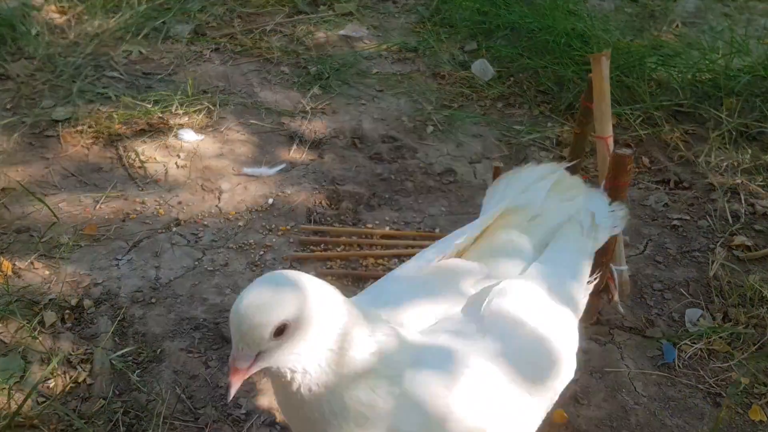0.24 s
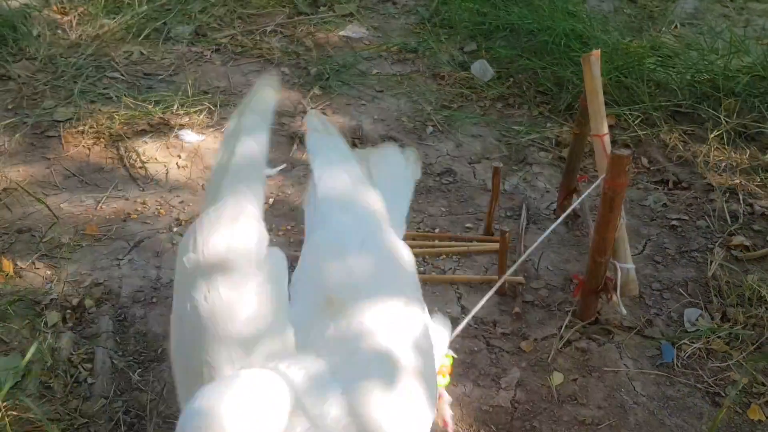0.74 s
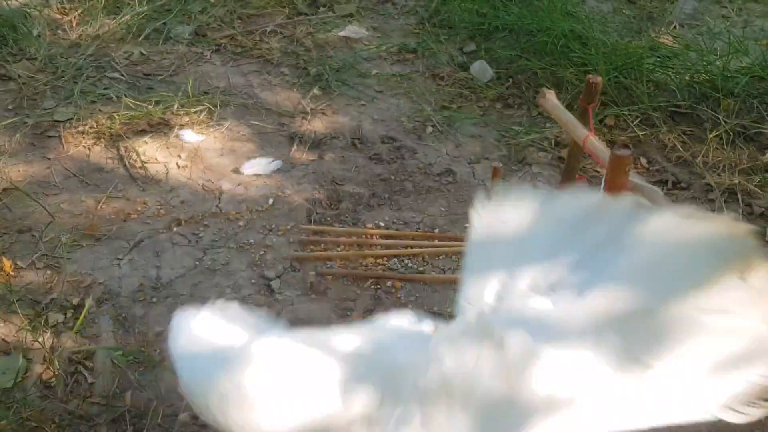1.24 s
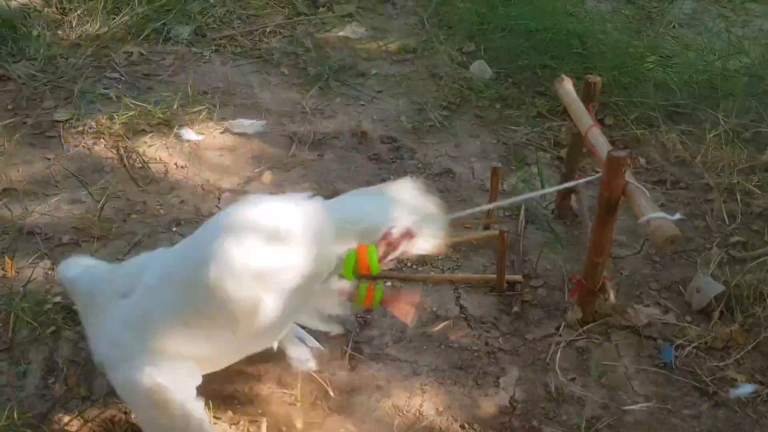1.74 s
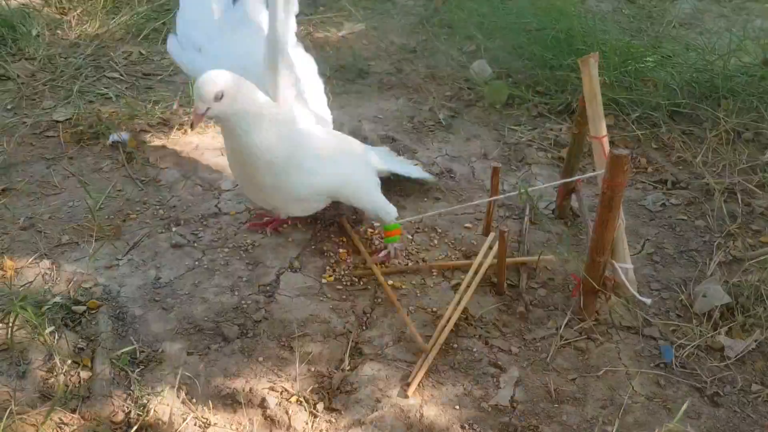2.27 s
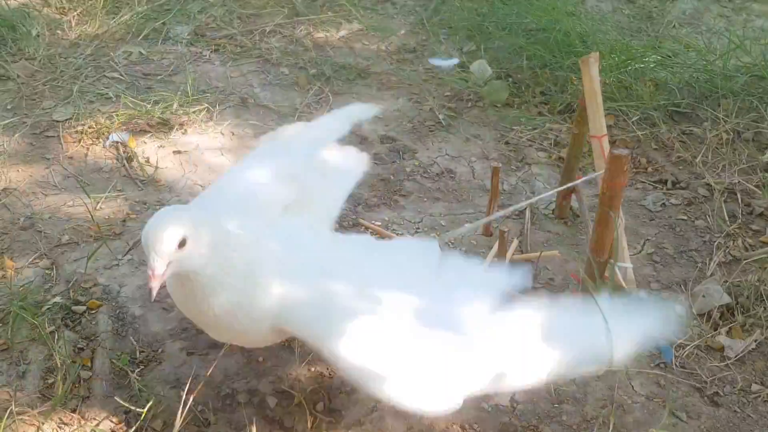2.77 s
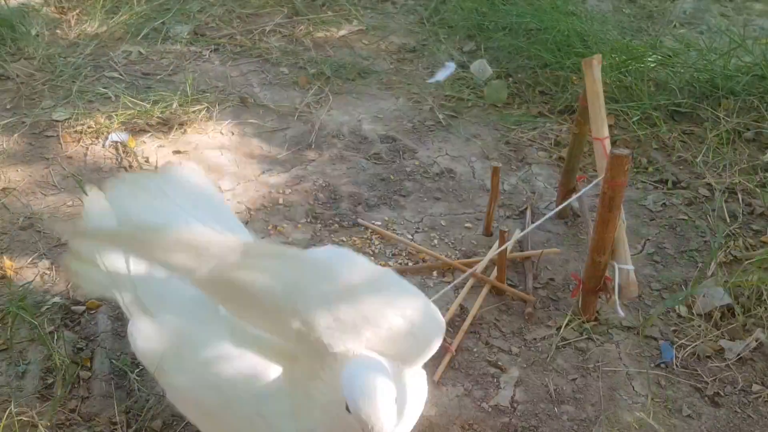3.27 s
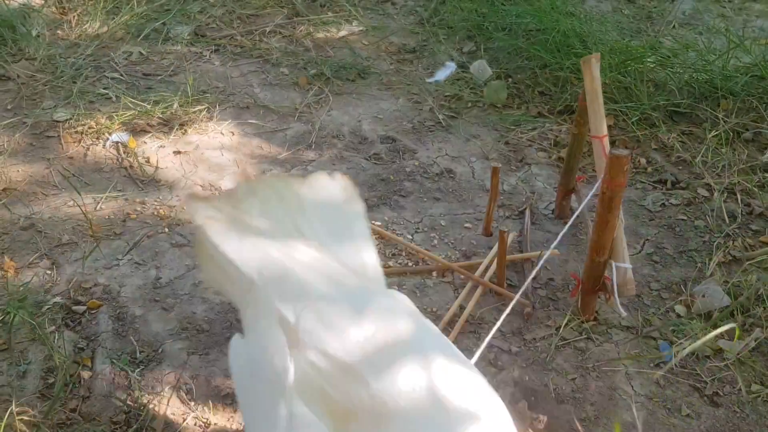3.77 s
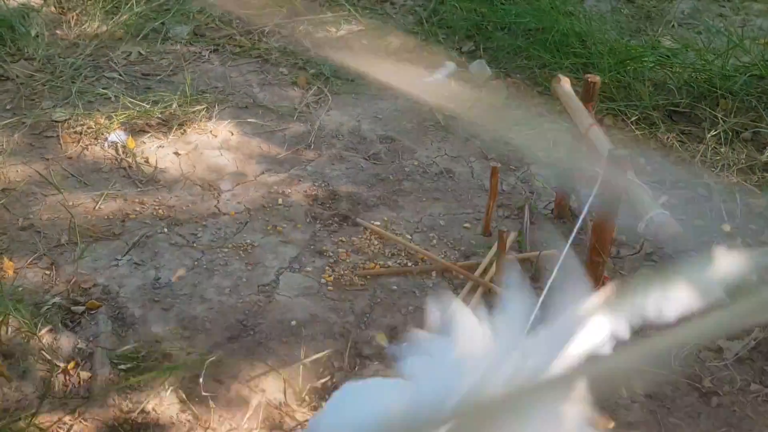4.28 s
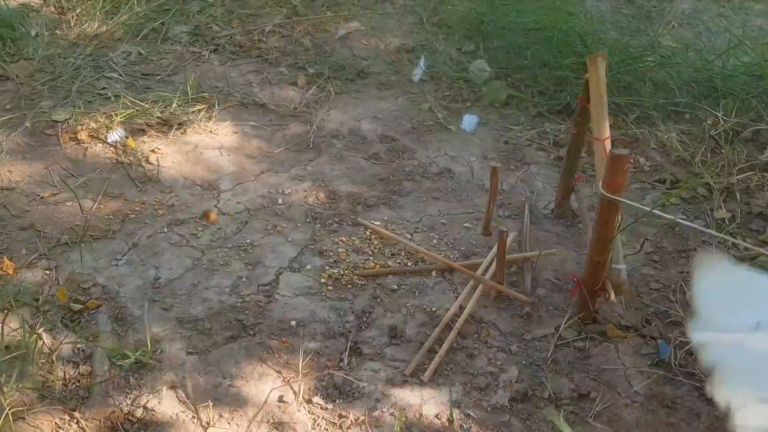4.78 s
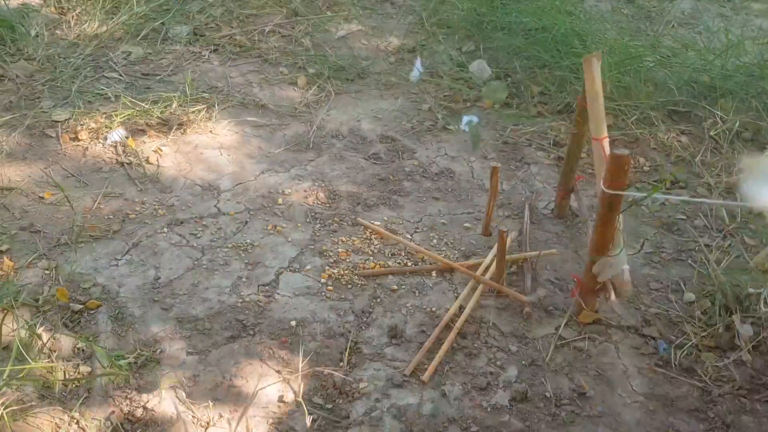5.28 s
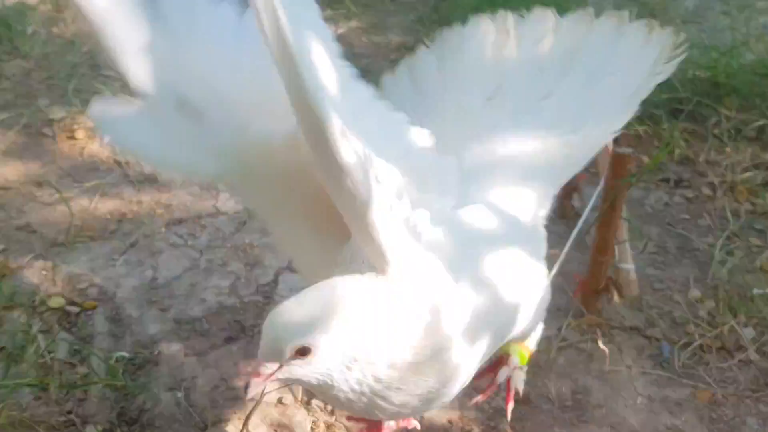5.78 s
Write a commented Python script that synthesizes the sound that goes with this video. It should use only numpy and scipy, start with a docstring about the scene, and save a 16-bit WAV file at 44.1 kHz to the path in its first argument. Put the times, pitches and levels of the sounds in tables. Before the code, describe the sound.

Close, frantic pigeon wingbeats come in three flurries, clapping and buffeting the microphone, with faint scuffling on dry grass between.

```python
"""A tethered pigeon beats its wings in three bursts, close to a pair of small microphones.
Friction of feathers in the bursts, and of feet on dry grass between them, makes a grainy rustle; impacts
add cracks, rings and thuds. Each downstroke sends a pressure pulse to the microphone ports, and its
turbulent wake buffets them. Far birds call faintly in harmonic tones over the open-air hush."""
import sys
import numpy as np
from scipy import signal
from scipy.fft import rfft, irfft, next_fast_len
from scipy.io import wavfile

SR = 44100
rng = np.random.default_rng(int(sys.argv[2]) if len(sys.argv) > 2 else 0)


def log_audio(samples):
    """Write samples as a 16-bit WAV file to the path given in sys.argv[1]."""
    # one column per channel
    frames = np.atleast_2d(samples).T
    # limit to full scale, then quantise
    limited = np.clip(frames, -1, 1)
    pcm = np.round(limited * 32767).astype(np.int16)
    wavfile.write(sys.argv[1], SR, pcm)


N = 265393

# Spectra of three bands of friction hiss and of the swept air: (frequency [Hz], spectral density [dB])
DULL_SPECTRUM = [(500, -25.5), (1300, 4), (2500, 2), (5000, -5), (8000, 0), (12000, -28)]
EDGE_SPECTRUM = [(2500, -27.5), (4200, -1), (7000, -3), (10000, -23.5)]
BRIGHT_SPECTRUM = [(3000, -27.5), (6500, -6.5), (10000, 1.5), (16000, 2)]
WHOOSH_SPECTRUM = [(100, -23.5), (250, 6), (500, 1), (1000, -3.5), (1600, -16.5), (4000, -38.5)]
# Rustle of feathers in the bursts, and of feet on dry grass between them:
# (time [s], relative level [dB], brightness [dB])
RUSTLE_CURVE = [(0.0, -55.5, 2.5), (0.08, -67, 2.5), (0.55, -63, 6), (1.0, -62, 5), (1.1, -46.5, 1.5),
                (1.3, -40.5, -0.5), (1.62, -52.5, 1), (1.95, -40.5, 0.5), (2.18, -55.5, 1),
                (2.3, -67.5, 3.5), (2.5, -67.5, 2), (2.95, -67, 5.5), (3.6, -76.5, 2), (3.77, -67, 3.5),
                (4.0, -63, 3), (4.17, -41, -1.5), (4.47, -40.5, 2.5), (4.6, -56, 0), (5.05, -57.5, 3),
                (5.31, -46, 1), (5.6, -50.5, 1.5), (5.86, -66, 1), (6.02, -55, 1)]


def rustle(grain_db=1.5, grain_hz=300, flutter_db=2.5, flutter_hz=30,
           ticks_per_s=110, tick_db=6, tick_s=0.00044):
    """Stick-slip friction: barbs or dry grass catch and let go, a ticking hiss over a duller whoosh."""
    level_db, bright_db = in_time(RUSTLE_CURVE)
    whoosh_flutter, dull_flutter, edge_flutter, bright_flutter = from_db(flutter_db * drift(flutter_hz, 4))
    slips = rng.random(N) < ticks_per_s / SR
    impulses = slips * np.minimum(rng.exponential(1, N), 2) * from_db(tick_db)
    ticks = signal.lfilter([1], [1, -np.exp(-1 / (tick_s * SR))], impulses)
    grain = unit_rms(from_db(grain_db * drift(grain_hz, channels=2)) * (1 + ticks))
    dull = dull_flutter * from_db(-1.5 - bright_db) * noise(DULL_SPECTRUM)
    edge = edge_flutter * from_db(-8.5) * noise(EDGE_SPECTRUM)
    bright = bright_flutter * from_db(bright_db / 2) * noise(BRIGHT_SPECTRUM)
    whoosh = whoosh_flutter * noise(WHOOSH_SPECTRUM, shared=0.33)
    swish_hiss, swish_whoosh = swishes()
    hiss_gain = np.hypot(from_db(level_db), swish_hiss)
    whoosh_gain = np.hypot(from_db(level_db - 0.5), swish_whoosh)
    return from_db(-5) * (hiss_gain * (dull + edge + bright) * grain + whoosh_gain * whoosh)


# Swishes of feathers in the bursts, and of feet on dry grass between them:
# (centre time [s], relative hiss level [dB], duration [s], whoosh over hiss [dB])
SWISHES = [(0.158, -53, 0.055, -8), (0.44, -57, 0.079, -24), (0.656, -50.5, 0.13, -26),
           (1.026, -60.5, 0.062, 13.5), (1.177, -35, 0.036, 3), (1.254, -30.5, 0.078, 2.5),
           (1.286, -33, 0.083, 6), (1.383, -32, 0.045, 12.5), (1.424, -30.5, 0.068, 0.5),
           (1.536, -30, 0.043, -4), (1.557, -35, 0.062, -2), (1.717, -39, 0.089, -5),
           (1.835, -34.5, 0.055, 1), (1.906, -32, 0.038, -6.5), (1.952, -43, 0.094, 7),
           (2.077, -37, 0.023, -10), (2.398, -80, 0.18, 8), (2.719, -70, 0.023, 25.5),
           (2.859, -63, 0.13, -6), (3.321, -61, 0.13, 3), (4.061, -46, 0.091, 3), (4.106, -30, 0.1, -3.5),
           (4.236, -28.5, 0.1, 5.5), (4.338, -34.5, 0.018, 3), (4.387, -25.5, 0.045, -19.5),
           (4.471, -31.5, 0.047, 6), (4.5, -34.5, 0.12, -1), (4.856, -44, 0.049, -14.5),
           (4.981, -48.5, 0.12, -5), (5.087, -44.5, 0.03, 0), (5.149, -36, 0.068, -5.5),
           (5.242, -46, 0.085, 7), (5.311, -40, 0.079, -3), (5.452, -33, 0.07, -2.5),
           (5.562, -29.5, 0.058, 5), (5.641, -42.5, 0.14, -11)]


def swishes():
    """Incoherent sources add in power: one smooth hump per swish, summed into hiss and whoosh gains."""
    power = np.zeros((2, N))
    for time_s, hiss_db, length_s, whoosh_db in SWISHES:
        hump = from_db([[hiss_db], [hiss_db + whoosh_db]]) ** 2 * np.hanning(round(length_s * SR))
        start = round((time_s - length_s / 2) * SR)
        power[:, start:start + hump.shape[1]] += hump
    return np.sqrt(power)


# Spectrum of an impact's thud: (frequency [Hz], spectral density [dB])
THUD_SPECTRUM = [(120, -15.5), (300, -0.5), (600, 7.5), (1200, -4.5), (2200, -9.5), (4000, -32)]
# Feathers and feet striking: (time [s], relative crack level [dB], relative thud level [dB],
# brightness [dB], 60 dB decay time [s], ring frequency [Hz])
IMPACTS = [(0.1133, -40, -68, 6, 0.023, 2900), (0.1512, -46, -55.5, 19, 0.033, 1100),
           (0.182, -39.5, -75, 12, 0.017, 4910), (0.289, -46, -78, 17, 0.013, 5000),
           (0.336, -43, -70, 20.5, 0.029, 5210), (0.4803, -27, -65, 1, 0.0036, 6130),
           (0.612, -37, -71, 7, 0.0092, 6900), (1.1165, -23, -47, 6.5, 0.056, 1950),
           (1.1756, -10, -25, 0.5, 0.025, 6600), (1.243, -20, -45, 1, 0.0091, 1700),
           (1.256, -5, -19.5, 2, 0.03, 1055), (1.263, -9, -12, -4, 0.0026, 1590),
           (1.3705, -8, -19, -10.5, 0.009, 1040), (1.3915, -5.5, -22.5, 3, 0.032, 984),
           (1.4099, -5.5, -19.5, 2, 0.022, 6400), (1.4336, -12.5, -26, 3, 0.012, 1890),
           (1.499, -11, -24.5, -5.5, 0.023, 2500), (1.5373, -7.5, -26, 0.5, 0.027, 3210),
           (1.681, -21.5, -49, 5, 0.049, 3020), (1.6887, -24, -31, 5, 0.018, 900),
           (1.707, -13, -35.5, -0.5, 0.024, 2010), (1.7748, -23.5, -29.5, -7, 0.021, 1100),
           (1.8164, -2, -29, 4, 0.0092, 5260), (1.8223, -19, -38, -3, 0.017, 2130),
           (1.842, -23, -30.5, 0, 0.01, 1460), (1.896, -7.5, -30, 0, 0.014, 4670),
           (1.9687, -14, -27.5, -4, 0.03, 1040), (2.012, -16, -53, 41, 0.0064, 6750),
           (2.0654, -10.5, -23.5, -4.5, 0.0091, 1680), (2.076, -28, -30.5, -10, 0.011, 834),
           (2.0946, -13, -48, 17, 0.004, 6380), (2.167, -9, -31.5, -7, 0.01, 1630),
           (2.333, -48.5, -80, 30, 0.011, 6600), (2.36, -41, -57, 29, 0.011, 6080),
           (2.3733, -38, -63, 30, 0.0092, 6460), (2.394, -34.5, -51, 35, 0.0087, 4700),
           (2.713, -40.5, -55, 14, 0.024, 995), (2.749, -58.5, -52.5, -2, 0.014, 800),
           (3.2947, -41, -61, 12, 0.014, 1008), (3.5697, -68, -60, 1, 0.012, 516),
           (3.7092, -58, -54, -0.5, 0.016, 696), (4.0451, -26, -38, 5, 0.02, 5320),
           (4.064, -17.5, -37, 0.5, 0.015, 5400), (4.0813, -6.5, -23, -0.5, 0.019, 2860),
           (4.119, -5, -25, -0.5, 0.012, 4970), (4.21, -1.5, -26, -4.5, 0.012, 4200),
           (4.2223, -7, -29, 8, 0.018, 1140), (4.2324, -6, -42, -1, 0.016, 2640),
           (4.2435, -8, -45, 2, 0.042, 1500), (4.2919, -28, -38, -3, 0.01, 2620),
           (4.3301, -21, -30.5, 7, 0.016, 1620), (4.3761, -10, -18, 7, 0.034, 1250),
           (4.3833, -4.5, -25, 2, 0.013, 6050), (4.4596, -7, -22, 1.5, 0.037, 1320),
           (4.4789, -17, -23, 1, 0.025, 990), (4.4878, -15, -36, -7.5, 0.02, 3870),
           (4.5515, -31, -43, 0, 0.01, 4000), (4.595, -31.5, -52, 9.5, 0.049, 1050),
           (4.6784, -32, -50, 2.5, 0.017, 6000), (4.8404, -30, -52, 8, 0.013, 5800),
           (5.0762, -15.5, -35.5, 1, 0.0057, 2290), (5.1322, -20.5, -33.5, -2.5, 0.059, 1000),
           (5.246, -23.5, -36.5, 0.5, 0.041, 1010), (5.287, -23, -42.5, 5.5, 0.048, 6100),
           (5.3877, -17, -30.5, -6.5, 0.026, 2320), (5.427, -8, -28.5, 1, 0.025, 4380),
           (5.455, -68, -33, -7, 0.023, 5760), (5.51, -22, -36.5, -0.5, 0.024, 4420),
           (5.55, -15, -39, 1, 0.044, 1150), (5.572, -14, -32, 6, 0.018, 6070),
           (5.909, -27, -54.5, 6, 0.014, 6550), (5.9813, -30.5, -54, 4, 0.0072, 5500)]


def slaps(rise_s=0.00043, settle_db=-20, settle_s=0.041, thud_extra_s=0.011,
          ring_db=-4, ring_cycles=18, crest_db=12.5):
    """Impact excites damped vibration: a fast crack, a ringing quill, settling vanes and a longer thud."""
    dull, bright, thud, rings = np.zeros((4, 2, N + SR))
    t = np.arange(SR // 5) / SR
    attack = 1 - np.exp(-t / rise_s)

    def decay(t60):
        """Damping takes 60 dB off the level in t60 seconds."""
        return attack * from_db(-60 * t / t60)

    phases = rng.uniform(0, 2 * np.pi, (len(IMPACTS), 2, 1))
    for (time_s, crack_db, thud_db, bright_db, t60, ring_hz), phase in zip(IMPACTS, phases):
        span = slice(round(time_s * SR), round(time_s * SR) + len(t))
        crack = decay(t60) + from_db(settle_db) * decay(settle_s)
        dull[:, span] += from_db(crack_db - crest_db - bright_db / 2) * crack
        bright[:, span] += from_db(crack_db - crest_db + bright_db / 2) * crack
        thud[:, span] += from_db(thud_db + 3) * decay(t60 + thud_extra_s)
        ring = decay(ring_cycles / ring_hz) * np.sin(2 * np.pi * ring_hz * t + phase)
        rings[:, span] += from_db(crack_db + ring_db - max(bright_db, 0)) * ring  # bright ticks ring less
    cracks = dull[:, :N] * noise(DULL_SPECTRUM) + bright[:, :N] * noise(BRIGHT_SPECTRUM)
    return cracks + thud[:, :N] * noise(THUD_SPECTRUM) + rings[:, :N]


# Gusts from the downstrokes: (centre time [s], pulse peak [dB], pulse frequency [Hz],
# pulse left-right [dB], eddy level [dB], eddy left-right [dB])
DOWNSTROKES = [(1.179, -26, 142, -14, -35, -3), (1.243, -15, 66, -2, -21, 10.5),
               (1.373, -15.5, 109.7, -0.5, -17, 5.5), (1.386, -6.5, 82.6, -5, -18, -2),
               (1.51, -23.5, 70, -9, -27.5, 0), (1.801, -20.5, 57, 12, -26, -9.5),
               (2.745, -34.5, 70.3, 21, -41.5, 12.5), (2.832, -31.5, 99, 7, -37.5, -8),
               (3.08, -41, 61.5, 20, -46.5, 16.5), (3.92, -29, 60, -9, -39, 8),
               (4.09, -21, 105, 8, -28.5, -11), (4.196, -31, 90, -8, -18.5, -7.5),
               (4.368, -37, 59.4, 14, -15.5, -2), (4.47, -32, 70, -5, -21.5, 3),
               (5.083, -27, 86, -2, -36, -3), (5.25, -17.5, 97, 0, -31.5, -4),
               (5.39, -17.5, 98, -4, -25, 4), (5.558, -21, 73, 13, -28.5, -3.5),
               (5.77, -41, 57, -21, -47.5, -21.5)]


def pressure_pulses(width_cycles=0.37):
    """Displaced air raises the pressure, which swings back within about a cycle: a Gaussian wavelet."""
    out, t = np.zeros((2, N)), np.arange(N) / SR
    for time_s, peak_db, hz, pan_db, *_ in DOWNSTROKES:
        near = slice(round((time_s - .05) * SR), round((time_s + .05) * SR))
        cycles = hz * (t[near] - time_s)
        swing = np.cos(2 * np.pi * cycles) * np.exp(-(cycles / width_cycles) ** 2 / 2)
        out[:, near] += from_db(peak_db) * pan_gains(pan_db)[:, None] * swing
    return out


# Spectrum of turbulent pressure at the ports: (frequency [Hz], spectral density [dB])
BUFFET_SPECTRUM = [(15, -51), (30, -8.5), (70, 1), (130, -10.5), (220, -13.5), (300, -24), (400, -43),
                   (1000, -68)]
# Air stirring round the ports between gusts: (time [s], level [dB], left-right [dB])
STIRRING_AIR = [(0.0, -54, -3), (1.07, -50.5, -3), (1.3, -39, -3.5), (1.65, -42, 1.5), (1.88, -32.5, 2),
                (2.43, -67.5, -7.5), (2.66, -56, 2.5), (2.95, -49, 12), (3.15, -49.5, 19.5),
                (3.5, -56, -12), (3.87, -43, -8), (4.05, -39, 3), (4.58, -40, -3), (4.74, -47, 23),
                (5.03, -65, 3), (5.3, -35, 0), (5.68, -54, -8), (6.02, -51, 2)]


def downwash(lag_s=0.0093, rise_db_per_s=398, fall_db_per_s=301.5, lump_db=3.5, lump_hz=18):
    """Turbulence trails each gust: eddies build fast, fade slower and strike each port in uneven lumps."""
    air_db, air_pan_db = in_time(STIRRING_AIR)
    power = (from_db(air_db) * pan_gains(air_pan_db)) ** 2
    t = np.arange(N) / SR
    for time_s, *_, eddy_db, pan_db in DOWNSTROKES:
        near = slice(round((time_s - .15) * SR), round((time_s + .25) * SR))
        past_peak_s = t[near] - time_s - lag_s
        shape_db = np.minimum(rise_db_per_s * past_peak_s, -fall_db_per_s * past_peak_s)
        power[:, near] += (from_db(eddy_db + shape_db) * pan_gains(pan_db)[:, None]) ** 2
    lumps = from_db(lump_db * drift(lump_hz, channels=2))
    return np.sqrt(power) * unit_rms(lumps * noise(BUFFET_SPECTRUM, shared=0.87))


# Notes of far birds: (onset [s], duration [s], pitch [Hz], final droop [Hz], level at resonance [dB],
# throat resonance [Hz], pitch jitter [fraction])
BIRD_NOTES = [(1.011, 0.069, 547, 13, -56.5, 1630, 0.04), (2.196, .14, 546, 5, -78, 1050, 0.06),
              (2.471, 0.1, 488, 53, -68, 950, .015), (2.898, .11, 462, -12, -63.5, 480, .015),
              (3.059, 0.61, 502, 100, -62.5, 970, 0.02), (3.953, 0.084, 547, 34, -68.5, 1600, .05),
              (4.451, 0.15, 507, 27, -48, 1500, 0.03)]


def far_birds(edge_db=-24.5, waver_db=2.5, throat_db_per_octave2=-90, throat_rise_per_droop=1.8):
    """Source and filter: each note swells, bends and fades; harmonics near the throat resonance carry."""
    out, jitter = np.zeros(N), drift(220)[0]
    for time_s, length_s, hz, droop_hz, peak_db, throat_hz, hoarseness in BIRD_NOTES:
        progress = np.linspace(0, 1, round(length_s * SR))
        span = slice(round(time_s * SR), round(time_s * SR) + len(progress))
        droop = droop_hz * progress ** 3
        pitch = hz - droop
        resonance = throat_hz + throat_rise_per_droop * droop
        level_db = peak_db + edge_db * (2 * progress - 1) ** 2
        phase = 2 * np.pi * np.cumsum(pitch * (1 + hoarseness * jitter[span])) / SR
        for k in range(1, 5):
            octaves_off = np.log2(k * pitch / resonance)
            out[span] += from_db(level_db + throat_db_per_octave2 * octaves_off ** 2) * np.sin(k * phase)
    waver = from_db(waver_db * drift(12))
    return np.sqrt(2) * out * waver * pan_gains(-3)[:, None]


# Spectrum of the open air: (frequency [Hz], spectral density [dB])
HUSH_SPECTRUM = [(60, -7), (130, 1), (350, -18), (500, -16), (800, -36), (2000, -37.5), (3500, -64),
                 (4500, -41.5), (16000, -55.5)]


def open_air_hush(level_db=-57):
    """Ambient sound is stationary noise, here strongest in the bass."""
    return from_db(level_db) * noise(HUSH_SPECTRUM)


# Likeness of the sound at the two ports: (frequency [Hz], correlation [-1 to 1])
COHERENCE = [(60, 0.72), (300, 1), (700, 0.59), (1500, 0.018), (3000, 0.019), (16000, 0.0089)]


def noise(spectrum, shared=1):
    """Spatial coherence falls toward the treble: stereo noise of a given spectrum, rms 1."""
    size = next_fast_len(N)
    log_hz = np.log(np.arange(size // 2 + 1) * SR / size + 1)

    def per_bin(points):
        """A curve interpolated over log frequency."""
        hz, values = np.transpose(points)
        return np.interp(log_hz, np.log(hz), values)

    mid, side = rfft(rng.standard_normal((2, size)))
    coherence = np.clip(shared * per_bin(COHERENCE), -1, 1)
    pair = np.sqrt(1 + coherence) * mid + np.sqrt(1 - coherence) * side * [[1], [-1]]
    return unit_rms(irfft(from_db(per_bin(spectrum)) * pair, size)[:, :N])


def drift(rate_hz, channels=1):
    """Two one-pole low-passes turn white noise into a slow random fluctuation of rms 1."""
    pole = np.exp(-2 * np.pi * rate_hz / SR)
    white = rng.standard_normal((channels, N + SR))
    return unit_rms(signal.lfilter([1], [1, -2 * pole, pole * pole], white)[:, SR:])


def from_db(db):
    """Decibels to amplitude ratio."""
    return 10 ** (np.asarray(db) / 20)


def unit_rms(x):
    """Normalisation to rms 1."""
    return x / np.sqrt(np.mean(x ** 2) + 1e-20)


def in_time(rows):
    """Linear interpolation of a table's columns to every sample."""
    times, *columns = np.transpose(rows)
    return [np.interp(np.arange(N) / SR, times, column) for column in columns]


def pan_gains(pan_db):
    """A level difference sets direction: left and right gains."""
    return from_db(np.multiply.outer([.5, -.5], pan_db))


# Direction of the pigeon: (time [s], left-right [dB])
PIGEON_DIRECTION = [(0.0, -4), (0.8, 0), (0.89, -2.5), (2.34, 1.5), (2.38, -2), (4.06, -1.5), (4.63, -1),
                    (4.83, -5), (5.43, -6), (6.02, 0)]


def scene():
    """Superposition: pigeon, moving air, far birds and hush add as pressures."""
    pigeon = (rustle() + slaps()) * pan_gains(*in_time(PIGEON_DIRECTION))
    return pigeon + downwash() + pressure_pulses() + far_birds() + open_air_hush()


# Microphone port resonances: (frequency [Hz], bandwidth [Hz], left gain [dB], right gain [dB])
PORT_RESONANCES = [(5920, 7630, 4.5, 11), (8125, 1770, -6.5, -19.5), (12830, 5400, 9, -2)]


def record(dry, bass_cut_hz=34, ceiling=1.1, treble_cut_hz=15750):
    """Port resonances lift or dip the treble; saturation rounds the peaks; both band edges are cut."""
    out = signal.sosfilt(signal.butter(3, bass_cut_hz, "high", fs=SR, output="sos"), dry)
    for hz, width_hz, *gains_db in PORT_RESONANCES:
        omega = 2 * np.pi * hz / SR
        alpha = np.sin(omega) * width_hz / hz / 2
        for channel, root_gain in enumerate(from_db(np.array(gains_db) / 2)):
            numerator = [1 + alpha * root_gain, -2 * np.cos(omega), 1 - alpha * root_gain]
            denominator = [1 + alpha / root_gain, -2 * np.cos(omega), 1 - alpha / root_gain]
            out[channel] = signal.lfilter(numerator, denominator, out[channel])
    out = ceiling * np.tanh(out / ceiling)
    return signal.sosfilt(signal.ellip(12, .5, 80, treble_cut_hz, fs=SR, output="sos"), out)


dry = scene()
out = record(dry)
log_audio(out)
```